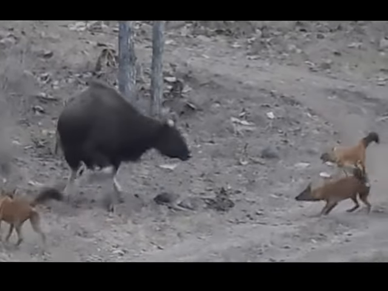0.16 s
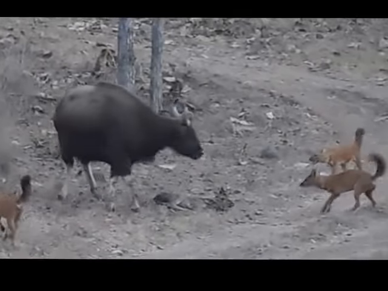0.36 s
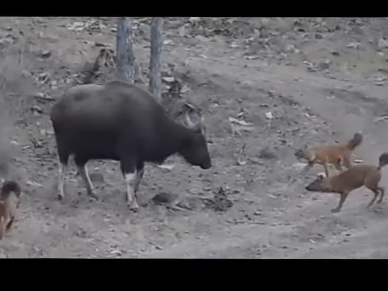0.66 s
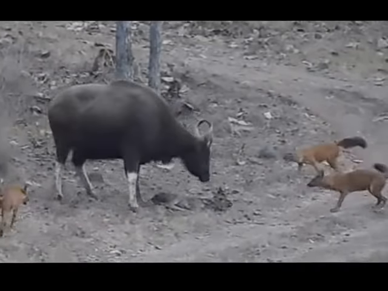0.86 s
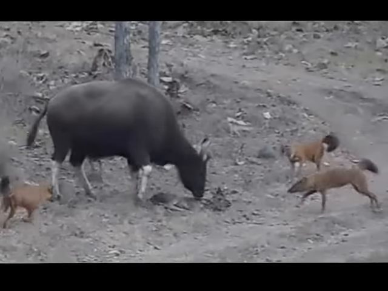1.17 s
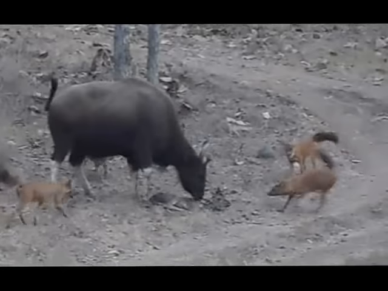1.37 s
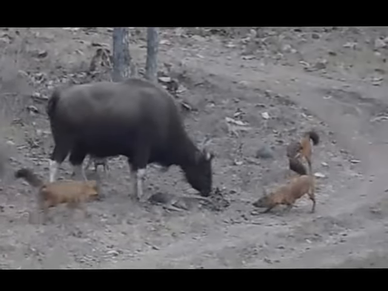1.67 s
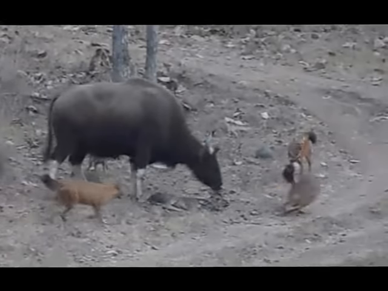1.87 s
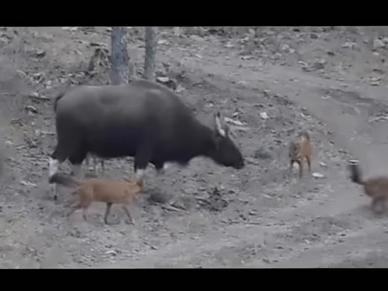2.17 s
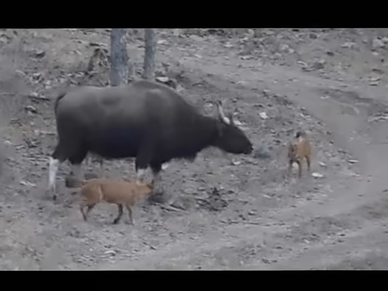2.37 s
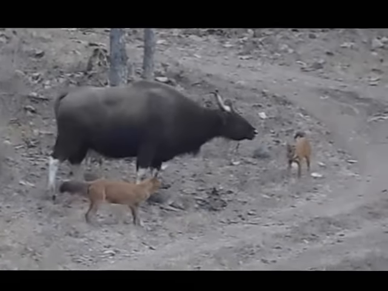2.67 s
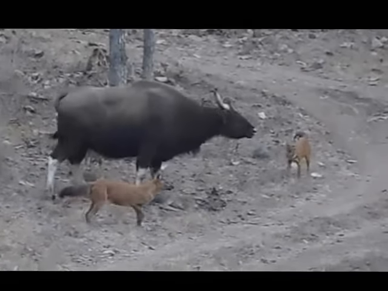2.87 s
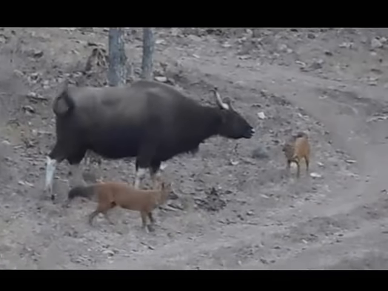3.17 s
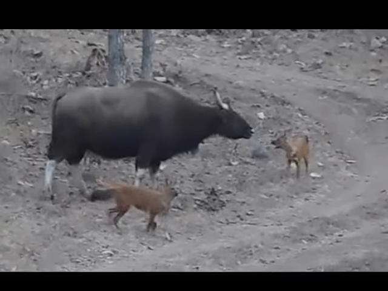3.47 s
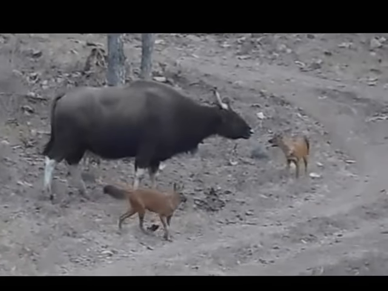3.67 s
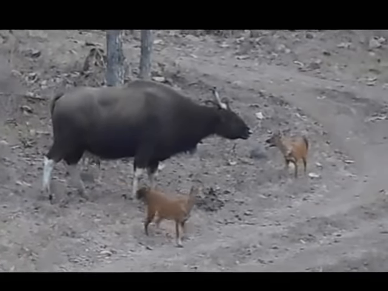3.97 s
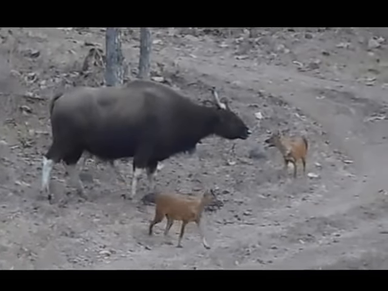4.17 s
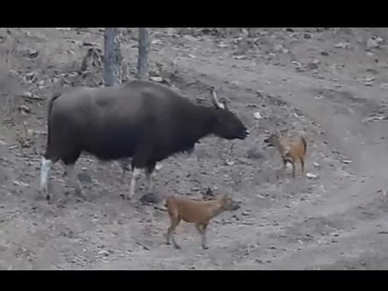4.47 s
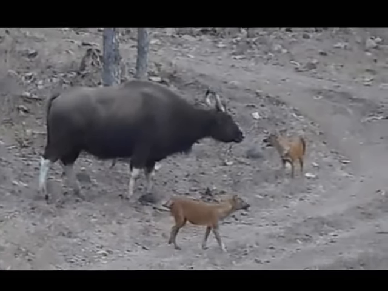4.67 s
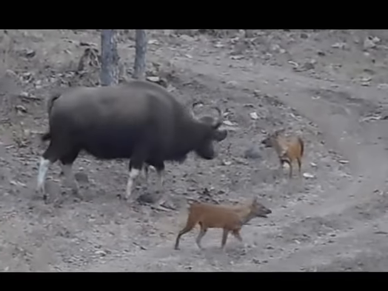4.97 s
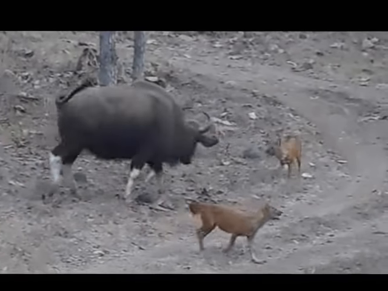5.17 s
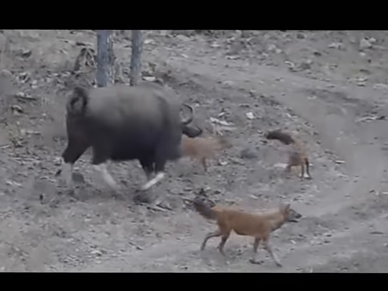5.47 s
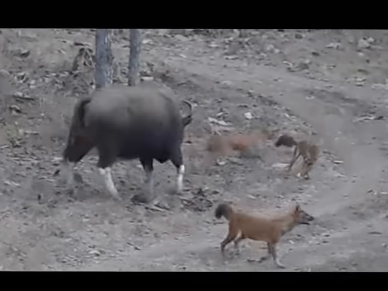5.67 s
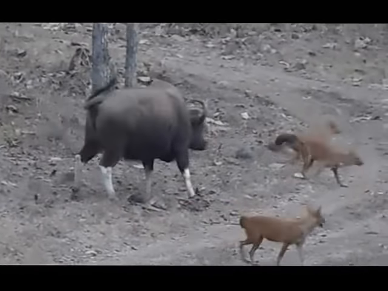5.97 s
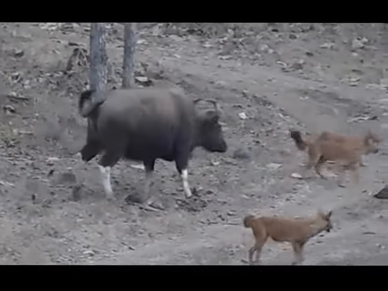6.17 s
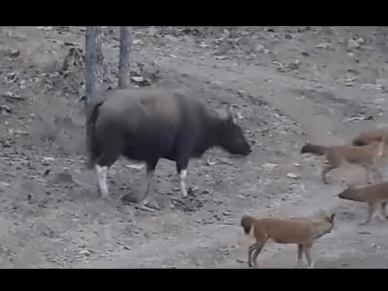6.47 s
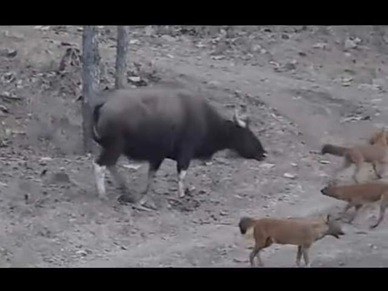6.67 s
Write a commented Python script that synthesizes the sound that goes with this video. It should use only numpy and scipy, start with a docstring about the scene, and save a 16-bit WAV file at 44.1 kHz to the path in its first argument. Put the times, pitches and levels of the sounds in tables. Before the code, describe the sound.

Wild dogs yelp around a large hoofed animal: two groups of three quick nasal honks, about half a second apart, rough at the onset and clean at the end. Between them, thin bird whistles, faint dove-like coos and dry litter cracks show through. A faint shimmering tree echo follows each yelp. Outdoor mono sound from some way off, with breathy woodland hiss rising and sinking around the calls.

```python
"""Wild dogs yelping in a dry forest

Two runs of three yelps, each hoarse (lines at thirds of the pitch), then a clear honk (clean harmonics).
The trees return a long fluttering echo (noise responses). Small birds whistle and chirp and a dove-like
voice coos (gliding sines); paws and hooves snap litter (noise bursts, short knocks). The hiss of the
woods (noise in half-octave bands) swells around each yelp."""
import sys
import numpy as np
from scipy import signal
from scipy.io import wavfile

SR = 44100
rng = np.random.default_rng(int(sys.argv[2]) if len(sys.argv) > 2 else 0)


def linear_from_db(decibels):
    """Turn decibels (scalar or array-like) into linear amplitude factors; 0 gives 1."""
    return 10 ** (np.asarray(decibels, float) / 20)


def to_wav(sig):
    """Store sig (one row per channel, or 1-D mono) as 16-bit WAV at the path in sys.argv[1].

    Samples outside -1..1 are clipped; the rate is SR.
    """
    pcm = np.clip(np.atleast_2d(sig), -1, 1) * 32767
    pcm = np.round(pcm).astype(np.int16)
    wavfile.write(sys.argv[1], SR, pcm.T)  # frames by channels


N = 300352


def at_rows(rows):
    """Sample span of a table (first column in seconds) and its columns joined by straight lines."""
    s, *columns = np.transpose(rows)
    span = np.arange(round(s[0] * SR), min(round(s[-1] * SR), N))
    return span, [np.interp(span / SR, s, c) for c in columns]


def unfold(start_s, length_s, shape):
    """Sample span of an event and a shared shape stretched over it."""
    share, *columns = np.transpose(shape)
    return at_rows(np.transpose([start_s + length_s * share, *columns]))


def rms_one(x):
    """Scales to rms 1."""
    return x / np.sqrt(np.mean(x ** 2) + 1e-20)


def drift(corner_hz, count=1):
    """Rows of noise through a two-pole low-pass, each with standard deviation 1."""
    r = np.exp(-2 * np.pi * corner_hz / SR)
    white = rng.standard_normal((count, N + 4000))
    slow = signal.lfilter([1], [1, -2 * r, r * r], white)[:, 4000:]   # drop the filter's settling
    return slow / slow.std(axis=1, keepdims=True)


def band(x, low_hz, high_hz):
    """Butterworth band-pass."""
    sos = signal.butter(2, [low_hz, min(high_hz, .45 * SR)], "band", fs=SR, output="sos")
    return signal.sosfilt(sos, x)


def fade(size, edge_s):
    """Soft start and end."""
    return signal.windows.tukey(size, min(2 * edge_s * SR / size, 1))


def tone(hz, rms_db, waver):
    """A sine of given rms level whose pitch wavers by a share."""
    phase = np.cumsum(2 * np.pi * hz * (1 + waver) / SR) + rng.uniform(0, 2 * np.pi)
    return np.sqrt(2) * linear_from_db(rms_db) * np.sin(phase)


def hoarse():
    """The folds repeat only every third cycle, so flickering lines stand at thirds of the pitch."""
    # Each row: start in seconds, length in seconds, 2nd harmonic in Hz, its level in dB, strain in dB;
    # pitch and level before the opening shape.
    openings = [(1.6, 0.08, 1251, -41, 0.1), (2.116, .085, 1242, -36.5, 1.9),
                (2.573, 0.079, 1227, -34.5, 2), (5.36, .09, 1262, -35.5, -3), (5.854, .085, 1232, -35.5, 2),
                (6.39, 0.081, 1239, -35, 2)]
    # Each row: share of length, pitch ratio, effort in dB, 3rd harmonic over 2nd in dB,
    # in-between lines over 2nd in dB (the last two before strain).
    opening_shape = [(0, 0.985, -7, -18.5, -11), (0.26, 1.02, -3.5, -1.5, -11.5),
                     (0.5, 1.002, -0.1, 4, -8.5), (0.8, 0.972, -4, -7, -1.5), (1, 0.995, -6.5, -4, 1.5)]
    # Each row: frequency in thirds of the pitch, dB from the in-between level.
    third_lines = [(4, -26), (5, -18.5), (7, 1.5), (8, 3), (10, -27), (11, -18), (12, -24.5), (13, -22.5)]
    out, waver = np.zeros(N), 0.0098 * drift(93)[0]
    flicker = drift(75, count=3 + len(third_lines))

    core = band(band(rng.standard_normal(N), 1000, 2050), 1000, 2050)
    wide = band(rng.standard_normal(N), 320, 3200)
    high = band(rng.standard_normal(N), 2600, 4600)
    breath = rms_one(core) + linear_from_db(-18.5) * rms_one(wide) + linear_from_db(-25.0) * rms_one(high)

    for start_s, length_s, pitch_hz, level_db, strain_db in openings:
        span, (ratio, effort_db, bright_db, rough_db) = unfold(start_s, length_s, opening_shape)
        hz = pitch_hz * ratio
        second_db = level_db + effort_db
        third_db = second_db + bright_db + strain_db
        between_db = second_db + rough_db + strain_db
        first_db = second_db - 15.5 + 0.57 * rough_db   # stronger as the voice roughens
        # (thirds of the pitch, level in dB, flicker depth in dB)
        lines = [(3, first_db, 4.6), (6, second_db, 0.71), (9, third_db, 0.54)]
        lines += [(k, between_db + db, 3.5) for k, db in third_lines]
        voice = 0
        for (k, db, depth_db), f in zip(lines, flicker):
            voice = voice + tone(hz * k / 6, db + depth_db * f[span], waver[span])
        onset = np.minimum(np.arange(len(span)) / (0.027 * SR), 1)   # the voice swells in over its first 27 ms
        rough_voice = voice + linear_from_db(between_db + 2.5) * breath[span]
        out[span] += onset * fade(len(span), 0.0036) * rough_voice
    return out


def honk():
    """Steady folds: clean harmonics, the third sitting on the throat resonance."""
    # One list per honk. Each row: time in seconds, 3rd harmonic in Hz, its level in dB.
    honk_tracks = [
        [(1.667, 1624, -44.5), (1.681, 1654, -26.5), (1.699, 1742, -28.5), (1.735, 1732, -39.5),
         (1.76, 1720, -45.5)],
        [(2.172, 1636, -34.5), (2.182, 1667, -32.5), (2.218, 1737, -23.5), (2.234, 1692, -33.5),
         (2.245, 1760, -39.5)],
        [(2.638, 1702, -37), (2.646, 1636, -28.5), (2.678, 1679, -23.5), (2.712, 1646, -37.5),
         (2.73, 1800, -40)],
        [(5.442, 1782, -32), (5.466, 1833, -25.5), (5.484, 1850, -36.5), (5.494, 1850, -54)],
        [(5.911, 1680, -37), (5.943, 1639, -25.5), (5.967, 1621, -26), (5.981, 1699, -33.5), (6.0, 1740, -46)],
        [(6.451, 1635, -50), (6.469, 1616, -27.5), (6.497, 1618, -29.5), (6.515, 1659, -27),
         (6.53, 1640, -41.5)],
    ]
    # Mouth shape of each honk: 2nd harmonic relative to the 3rd in dB.
    mouth_dbs = [-20, -24.5, -16, -9, -17, -14]
    # Each row: harmonic number, dB from the 3rd at full push, share of the push it follows.
    low_harmonics = [(1, -27.5, 0.63), (4, -24.5, 1.2)]
    # Each row: harmonic number, dB from the 3rd at full push.
    top_harmonics = [(5, -34), (6, -40.5), (7, -43), (8, -35.5), (9, -38)]
    full_push_db = -24
    out, waver, flicker_db = np.zeros(N), .002 * drift(40)[0], .6 * drift(50)[0]
    for rows, mouth_db in zip(honk_tracks, mouth_dbs):
        span, (hz, third_db) = at_rows(rows)
        push_db = third_db - full_push_db
        top_db = third_db + 1.3 * push_db   # a harder push brightens the voice
        lines = [(k, full_push_db + db + share * push_db) for k, db, share in low_harmonics]
        lines += [(2, third_db + mouth_db), (3, third_db)]
        lines += [(k, top_db + db) for k, db in top_harmonics]
        voice = sum(tone(hz * k / 3, db + flicker_db[span], waver[span]) for k, db in lines)
        out[span] += fade(len(span), 0.011) * voice
    return out


def echo_db(delay_s):
    """Relative strength by delay: near trunks, the clearing's edge and the deep forest, summed as power."""
    near = -39 - 259 * np.abs(delay_s - 0.03)   # slopes in dB per second
    edge = -50.5 - 73 * np.maximum(delay_s - 0.24, 0)
    far = -62 - 19.5 * delay_s
    return 10 * np.log10(linear_from_db(near) ** 2 + linear_from_db(edge) ** 2 + linear_from_db(far) ** 2)


def trees(x, low_hz, high_hz, flutter_hz):
    """Countless trunks send back faint copies; moving air and leaves make each group of paths flutter."""
    span = np.arange(SR // 250, round(1.2 * SR))   # delays from 4 ms to 1.2 s
    strength = linear_from_db(echo_db(span / SR))
    out = 0
    for noise, flutter in zip(rng.standard_normal((5, 2 * SR)), drift(flutter_hz, count=5)):
        reply = np.zeros(2 * SR)
        reply[span] = noise[span] * strength
        copies = signal.fftconvolve(x, band(reply, low_hz, high_hz))[:N]
        out = out + (1.25 + flutter) * copies
    return out * 0.27


def add_notes(out, notes, bend, crest, start_db, end_db, slide, flicker_db, waver, edge_s):
    """Each note slides up into its pitch while gliding between two pitches under a rise and fall.

    bend: glide exponent; crest: share of length; start_db, end_db: dB down; slide: share of pitch."""
    slide_s = 0.011
    arch_shape = [(0, 0, -start_db), (crest, crest, 0), (1, 1, -end_db)]
    for start_s, length_s, from_hz, to_hz, db in notes:
        span, (share, arch_db) = unfold(start_s, length_s, arch_shape)
        glide_hz = from_hz + (to_hz - from_hz) * share ** bend
        hz = glide_hz * (1 - slide * np.exp(-share * length_s / slide_s))
        out[span] += fade(len(span), edge_s) * tone(hz, db + arch_db + flicker_db[span], waver[span])


def birds():
    """Near-sine whistles and coos, and husky chirps whose pitch shakes widely."""
    # Each row of all three: start in seconds, length in seconds, from Hz, to Hz, level at the crest in dB
    # (pitch before slide and waver, level before flicker).
    whistles = [(1.0, .03, 9400, 9150, -77), (1.119, 0.069, 8800, 8680, -76),
                (1.198, .025, 6640, 7350, -71), (2.39, .025, 2440, 2290, -46.5),
                (2.773, 0.056, 6870, 6440, -63), (2.947, 0.096, 6680, 5800, -64.5),
                (3.153, .095, 5690, 3780, -61.5), (3.369, .1, 5570, 3810, -63.5),
                (4.197, .037, 6400, 6190, -69.5), (4.237, 0.015, 5670, 5450, -69),
                (4.258, 0.034, 6540, 7250, -76.5), (5.08, 0.028, 8300, 8200, -80),
                (5.578, .11, 9330, 9130, -78)]
    coos = [(0.86, 0.058, 550, 650, -69.5), (1.06, 0.049, 493, 505, -69), (1.22, 0.051, 566, 600, -69),
            (1.355, .06, 670, 694, -68.5), (1.45, .07, 667, 613, -63), (1.845, 0.35, 475, 565, -62)]
    chirps = [(1.902, 0.046, 7140, 6330, -61.5), (6.175, 0.09, 7330, 7380, -65.5),
              (6.385, .075, 7160, 7050, -72), (6.461, 0.065, 7250, 7230, -64),
              (6.64, 0.054, 6920, 6950, -67.5), (6.691, .08, 7300, 7600, -75)]
    out, (waver, shake, flicker) = np.zeros(N), drift(100, count=3)
    add_notes(out, whistles, bend=1.3, crest=0.68, start_db=3.5, end_db=2, slide=0.045,
              flicker_db=3.2 * flicker, waver=0.0034 * waver, edge_s=0.0053)
    add_notes(out, coos, bend=0.747, crest=0.67, start_db=5.7, end_db=5.4, slide=0.0085,
              flicker_db=2.5 * flicker, waver=0.0045 * waver, edge_s=0.0077)
    add_notes(out, chirps, bend=0.85, crest=0.39, start_db=4.9, end_db=8.3, slide=0.0071,
              flicker_db=4.9 * flicker, waver=0.019 * shake, edge_s=0.014)
    return out


def litter():
    """Twigs crack as short broad bursts with a leafy tail, small ones at random; a hoof gives a dull knock."""
    # Each row: start in seconds, peak in dB, nominal centre in Hz.
    snaps = [(0.4204, -47, 3830), (0.9344, -53, 3960), (1.0944, -55, 2660), (1.1794, -58, 2930),
             (1.9644, -43.5, 3320), (2.0544, -49, 3140), (2.0966, -46, 2820), (4.1764, -50, 2760),
             (4.6194, -59, 3060), (4.6488, -52, 2750), (5.2515, -47, 4600), (5.3438, -52, 4380),
             (5.4201, -43, 3400), (5.7399, -40.5, 3000), (5.9529, -41, 2830)]
    # Each row: start in seconds, level in dB, frequency in Hz.
    thuds = [(3.372, -45, 520), (5.741, -45, 720), (5.745, -50, 270)]
    out, t = np.zeros(N + SR), np.arange(SR // 20) / SR
    # 40 small cracks: any time, -68 to -58 dB, 3 to 8 kHz
    small = rng.random((40, 3)) * [N / SR, 10, 5000] + [0, -68, 3000]
    for start_s, db, hz in np.vstack([snaps, small]):
        decay = np.exp(-t / 0.0063) + 0.43 * np.exp(-t / 0.016)
        crack = band(rng.standard_normal(len(t)) * decay, hz / 2.2, hz * 1.45)
        out[round(start_s * SR):][:len(t)] += linear_from_db(db) * crack / np.abs(crack).max()
    for start_s, db, hz in thuds:
        arch = np.sin(np.pi * np.minimum(t * hz / 2.0, 1))   # two cycles long
        out[round(start_s * SR):][:len(t)] += linear_from_db(db) * np.sin(2 * np.pi * hz * t) * arch
    return out[:N]


def swell_db(lag_s):
    """The hiss rises to a crest after each yelp, then sinks quickly at first and slowly after."""
    # Each row: crest time in seconds, crest level in dB before the colour of the woods.
    crests = [(-0.05, -39), (1.86, -40), (2.311, -38), (2.808, -39.5), (5.6, -39), (6.11, -39.5),
              (6.62, -39.5)]
    calm_db = -50.5
    rise_s, quick_s, slow_s, slow_share = 0.39, 0.11, 0.4, 0.43
    power = linear_from_db(calm_db) ** 2
    for crest_s, db in crests:
        t = np.arange(N) / SR - crest_s - lag_s
        after = np.maximum(t, 0)
        rise = np.clip(1 + t / rise_s, 0, 1) ** 2
        fall = (1 - slow_share) * np.exp(-after / quick_s) + slow_share * np.exp(-after / slow_s)
        power = power + linear_from_db(db) ** 2 * rise * fall
    return 10 * np.log10(power)


def woods():
    """Half-octave bands of noise; lows swell a little behind the highs, and the treble rustles in patches."""
    # Each row: frequency in Hz, colour of the hiss in dB before the swell.
    hiss_colour = [(25, -11.5), (60, -9), (150, -3), (400, 0.5), (800, 0.5), (1500, -2.5), (3000, -7),
                   (5500, -15), (7500, -18), (10000, -33)]
    colour_hz, colour_db = np.transpose(hiss_colour)
    lows_db, highs_db = -4.5 + swell_db(lag_s=0.02), swell_db(lag_s=0)
    white = rng.standard_normal((2, N + SR))
    edges_hz = 22 * 2 ** np.arange(0, 9.1, .5)
    gust, rustle, own = drift(17)[0], drift(7.9)[0], drift(10, count=4)
    out = 0
    for k, (low_hz, high_hz) in enumerate(zip(edges_hz, edges_hz[1:])):
        hz = np.sqrt(low_hz * high_hz)
        share = np.clip(np.log(hz / 300) / np.log(3000 / 300), 0, 1)   # 0 = lows, 1 = highs
        band_db = np.interp(np.log(hz), np.log(colour_hz), colour_db)
        level_db = band_db + (1 - share) * lows_db + share * highs_db
        patches_db = share * (0.7 * gust + 0.77 * rustle) + 0.67 * own[k % len(own)]
        out = out + band(white[k % 2], low_hz, high_hz)[SR:] * linear_from_db(level_db + patches_db)
    return out


def scene():
    """Direct voices plus their echo, over the woods."""
    yelps, near = hoarse() + honk(), birds() + litter()
    yelp_echo = trees(yelps, 980, 3500, flutter_hz=73.0)
    near_echo = linear_from_db(3.0) * trees(near, 3200, 9000, flutter_hz=30)
    return (yelps + near + yelp_echo + near_echo + woods())[None]


def band_limit(x):
    """A steep low-pass at the top of the band."""
    return signal.sosfilt(signal.butter(12, 15600, fs=SR, output="sos"), x)


def record(dry):
    """Sampled at half rate and joined by straight lines, which mirrors the treble about 11025 Hz."""
    low_pass = signal.cheby2(12, 45, 10716.6, fs=SR, output="sos")   # stop-band edge in Hz
    half = signal.sosfilt(low_pass, dry[0])[::2]
    joined = np.interp(np.arange(N), 2 * np.arange(len(half)), half)
    mix = signal.sosfilt(signal.cheby2(18, 70, 16300, fs=SR, output="sos"), joined)
    return band_limit(mix[None])


dry = scene()
out = record(dry)
to_wav(out)
```